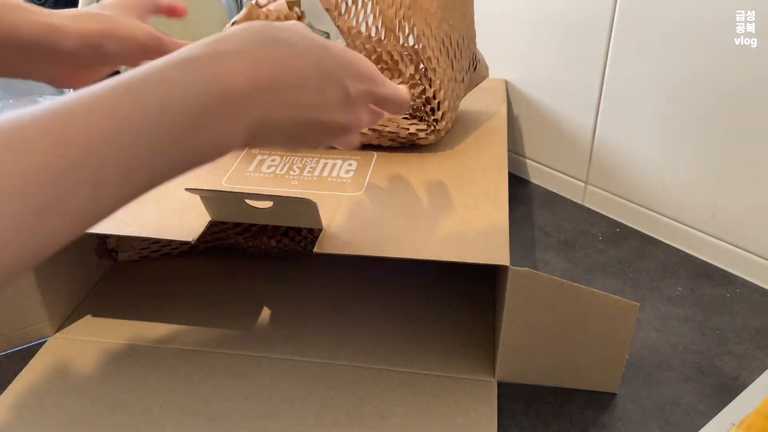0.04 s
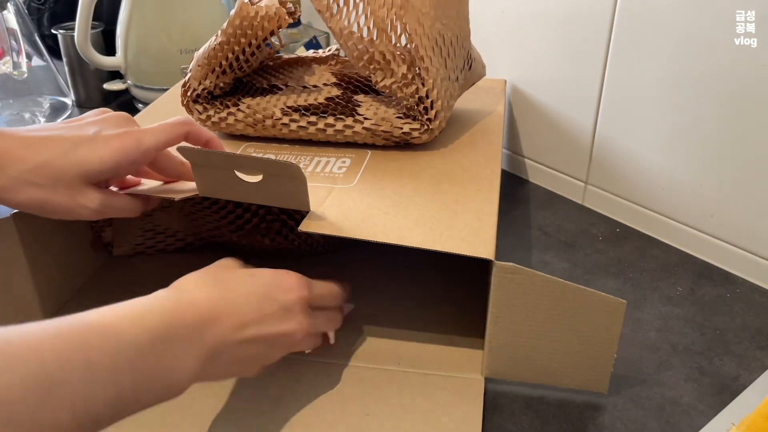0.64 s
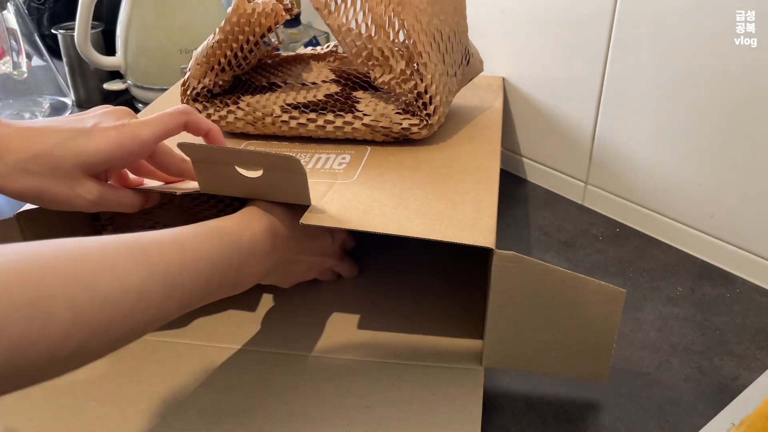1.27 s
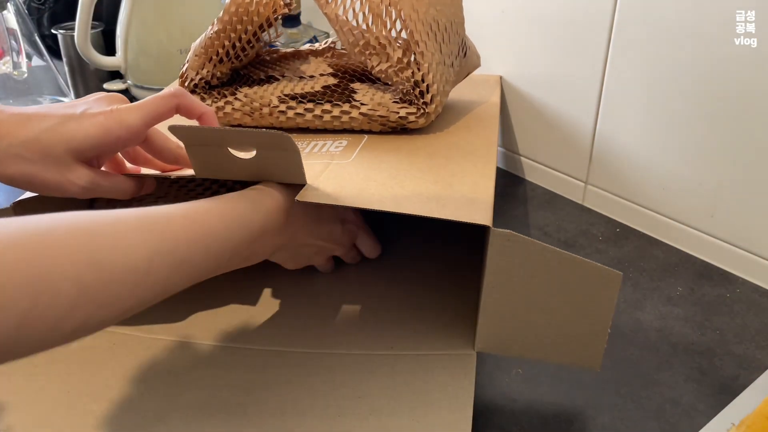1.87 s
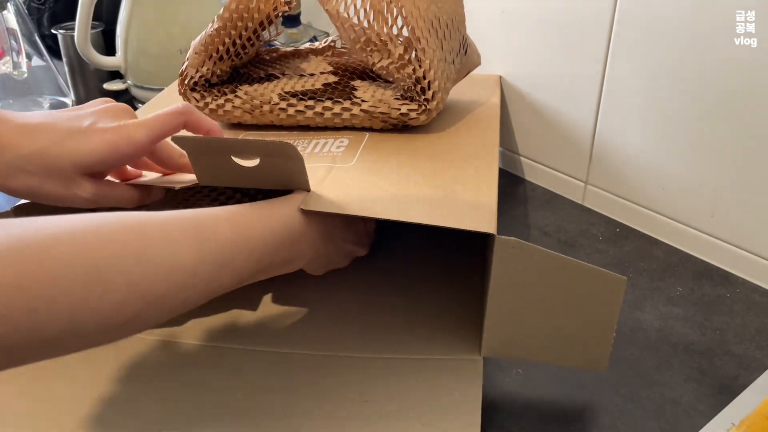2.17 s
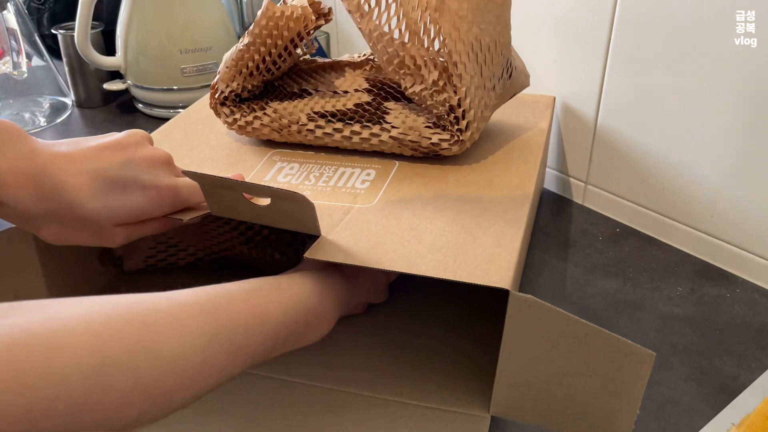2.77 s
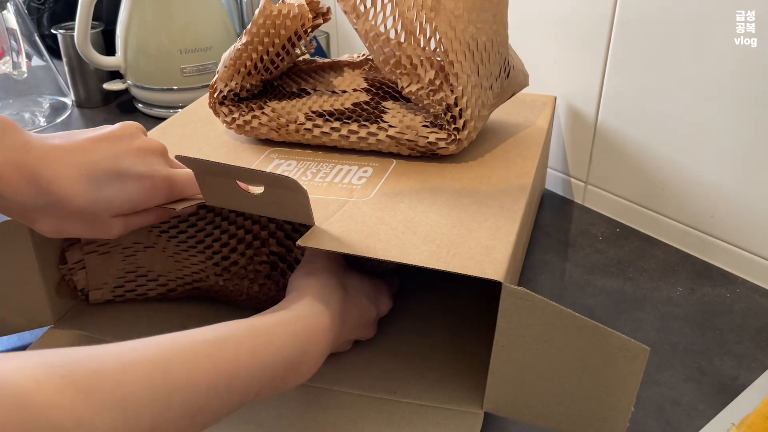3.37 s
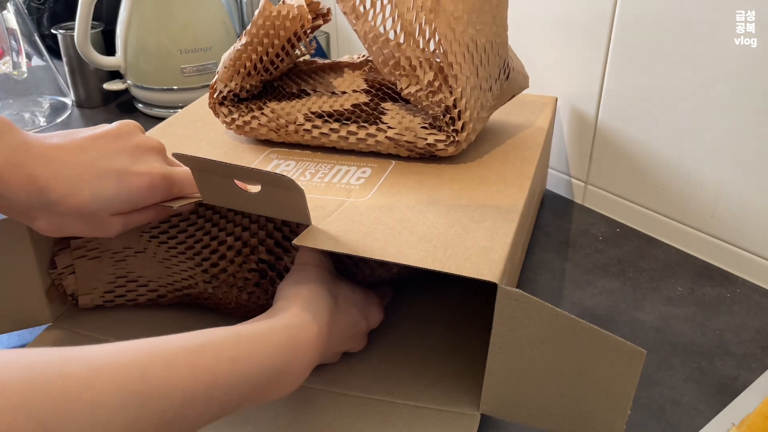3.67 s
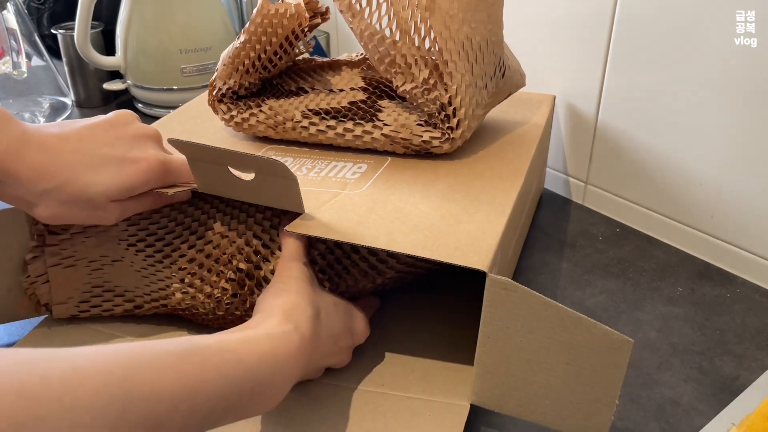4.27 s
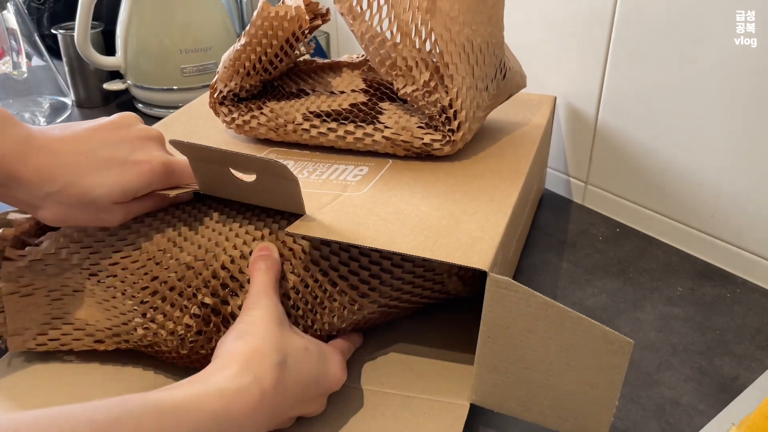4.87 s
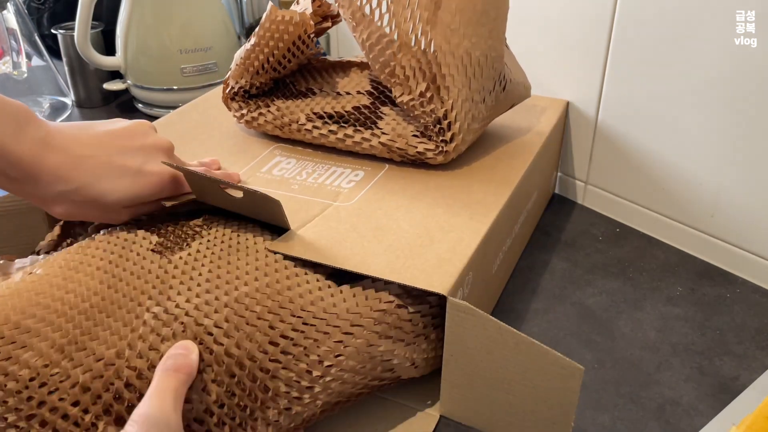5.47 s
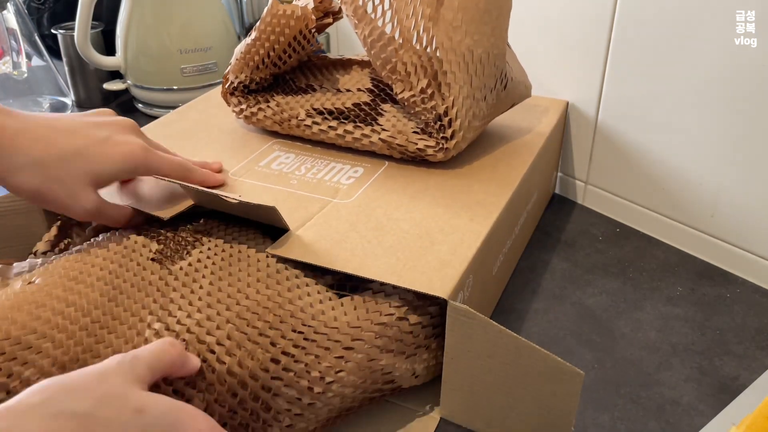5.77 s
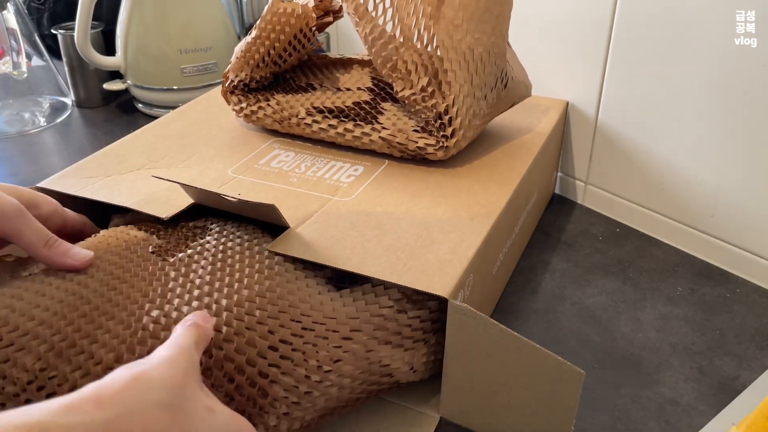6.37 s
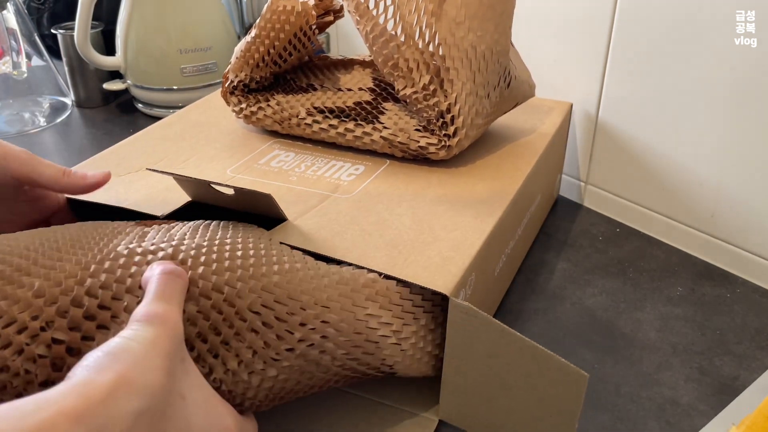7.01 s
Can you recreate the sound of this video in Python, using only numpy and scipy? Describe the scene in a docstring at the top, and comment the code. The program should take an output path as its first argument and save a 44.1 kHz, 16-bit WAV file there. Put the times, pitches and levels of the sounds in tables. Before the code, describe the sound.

A hand bumps around in a cardboard box, then drags out crackling kraft paper wrap in three tugs, followed by light rustling.

```python
"""A hand reaches into a cardboard box on a kitchen counter: panels thump, flaps clack, paper crinkles.
From 2.6 s three tugs drag out a wad of honeycomb kraft paper, which crackles in thousands of tiny
buckles, scrapes the box floor, ticks over the lid's edge and, in the last tug, squeals by stick-slip.
Near 5.5 s creases snap, and light touches follow until 7 s. Throughout, a phone close by hears
the reflections of the box and the tiled room over a faint rumble."""
import sys
import numpy as np
from scipy import signal
from scipy.fft import rfft, irfft
from scipy.io import wavfile
from scipy.ndimage import uniform_filter1d

SR = 44100
rng = np.random.default_rng(int(sys.argv[2]) if len(sys.argv) > 2 else 0)


def transcribe(u):
    """Save the signal u as a 16-bit wav file named by the first command-line argument.

    u: samples, shape (n,) or (channels, n), limited to [-1, 1]; the rate is SR.
    q: integer samples, one column per channel.
    """
    v = np.clip(np.atleast_2d(u).T, -1, 1)
    q = np.round(v * 32767).astype(np.int16)
    wavfile.write(sys.argv[1], SR, q)


N = 310464
SETTLE_DB_PER_S = 131.5  # the paper comes to rest once the hand lets go


def undb(db):
    """Amplitude ratio of a level: tenfold for every 20 dB."""
    return 10 ** (np.asarray(db) / 20)


def unit(x):
    """Normalisation to rms 1."""
    return x / np.sqrt(np.mean(x ** 2) + 1e-20)


def envelope(table, column):
    """Amplitude envelope from a column of timed levels, falling exponentially outside their span."""
    rows, t = np.array(table), np.arange(N) / SR
    outside_s = np.maximum(rows[0, 0] - t, 0) + np.maximum(t - rows[-1, 0], 0)
    return undb(np.interp(t, rows[:, 0], rows[:, column]) - SETTLE_DB_PER_S * outside_s)


def per_bin(table):
    """Interpolation over log frequency, giving a value at every spectral bin."""
    hz, values = np.array(table).T
    return np.interp(np.log(np.fft.rfftfreq(N, 1 / SR) + 1), np.log(hz), values)


def colour(x, spectrum):
    """Minimum-phase filtering shapes the spectrum while clicks keep their sharp fronts; rms 1."""
    cepstrum = irfft(np.log(undb(per_bin(spectrum))), N)
    response = np.exp(rfft(2 * cepstrum[:N // 2], N))
    return unit(irfft(rfft(x) * response, N))


def fade(t, t60):
    """Exponential decay by 60 dB in t60."""
    return np.exp(-np.log(1000) * t / t60)


def wander(rate):
    """Random modulation of rms 1, gliding to a new value `rate` times a second."""
    hold = max(int(SR / rate), 2)
    steps = np.repeat(rng.standard_normal(N // hold + 1), hold)
    return unit(uniform_filter1d(steps, hold)[:N])


def add(track, start, sound):
    """Superposition of a sound on the track at a time in s."""
    i = max(int(start * SR), 0)
    track[i:i + len(sound)] += sound[:len(track[i:])]


def clicks(rate, spread_db):
    """Poisson impulses, many small and a few large, with the same power at any rate."""
    size = undb(spread_db * np.minimum(rng.exponential(size=N), 4))
    return (rng.random(N) < rate / SR) * size * rng.choice([-1, 1], N) / np.sqrt(rate)


def ring(x, hz, q):
    """Response of a damped resonator driven by x."""
    return signal.lfilter(*signal.iirpeak(hz, q, fs=SR), x)


def room_rumble(level_db=-58.5):
    """Stationary noise, strongest in the bass: the kitchen at rest."""
    # (frequency [Hz], relative spectral density [dB])
    spectrum = [(25, -10), (60, 7), (140, 4.5), (300, -43), (1000, -27), (12000, -62)]
    return undb(level_db) * colour(rng.standard_normal(N), spectrum)


def reflections(x, t60, delay_s, top_hz, spot_count):
    """Diffuse reverberation, uncorrelated at the two ports, varies as sound comes from spot after spot."""
    t = np.arange(int(SR * t60)) / SR
    x = signal.sosfilt(signal.butter(2, [300, top_hz], "band", fs=SR, output="sos"), x)
    spots = np.array([wander(35) for _ in range(spot_count)])
    out = 0
    for share in spots / np.linalg.norm(spots, axis=0):
        tails = rng.standard_normal((2, SR))[:, :len(t)] * fade(t, t60) * (t > delay_s)
        tails /= np.linalg.norm(tails, axis=1, keepdims=True)
        out = out + signal.oaconvolve((share * x)[None], tails, axes=1)[:, :N]
    return out


def knocks(reach_octaves=0.36, contact_s=0.0014):
    """Modal vibration: a blow excites most the modes of the box near the pitch of the struck spot."""
    # blows on the box: (time [s], peak level [dB], pitch of the spot [Hz])
    blows = [(0.401, -29.5, 720), (0.405, -29.5, 290), (0.417, -21.5, 127), (0.4462, -29.5, 273),
             (1.074, -33, 89), (1.2044, -15, 860), (1.21, -29, 404), (1.212, -26.5, 99),
             (1.611, -28.5, 241), (2.397, -30, 273), (2.995, -17.5, 615), (3.007, -26, 160),
             (3.065, -16, 696), (3.072, -27, 128), (5.173, -21.5, 286), (5.188, -20.5, 148),
             (5.503, -29.5, 148), (6.0135, -51, 960), (6.144, -45, 960), (6.213, -37, 190),
             (6.585, -27.5, 149), (6.949, -26.5, 131)]
    # modes of the box: (frequency [Hz], relative level [dB], t60 [s])
    modes = [(91, -0.5, 0.24), (129.3, -0.5, 0.28), (151.6, 4.5, 0.18), (199, 2, 0.14), (249.5, 3.5, 0.3),
             (286, 5, 0.18), (361.6, 4, 0.19), (442, -2, 0.22), (665, -3, 0.02), (750, 5.5, 0.031),
             (832, 9.5, 0.022), (943, 5.5, 0.019), (1116, 1, 0.032)]
    out, t = np.zeros(N), np.arange(SR // 2) / SR
    hz, mode_db, t60 = np.array(modes).T[:, :, None]
    onset = 1 - np.exp(-(t / contact_s) ** 2)
    for start, db, spot_hz in blows:
        weight = undb(mode_db) / (1 + (np.log2(hz / spot_hz) / reach_octaves) ** 2)
        loaded_hz = hz * (1 + 0.027 * rng.standard_normal(hz.shape))  # the hands' load varies
        thump = onset * (weight * fade(t, t60) * np.sin(2 * np.pi * loaded_hz * t)).sum(0)
        add(out, start, undb(db) * thump / np.abs(thump).max())
    return out


def snaps(burst_s=0.006, panel_hz=820, panel_db=-2.5):
    """Impulsive excitation: a crease gives way in a broad burst, and the panel resonates with a clack."""
    # creases and flaps: (time [s], peak of the crack [dB], offset to panel_db [dB])
    creases = [(0.37, -45, 0), (.402, -41, 0), (0.4467, -33, 1.5), (.8175, -38, 4), (1.202, -28, -5),
               (1.607, -27.5, 3), (1.956, -27, -3.5), (2.436, -23.5, -6), (2.995, -30.5, 4),
               (3.064, -23, 1), (5.471, -18.5, -34), (5.4945, -18.5, -21), (5.5012, -24, -4.5),
               (6.013, -41.5, 0), (6.1444, -40.5, 2), (6.945, -21.5, 2)]
    out, t = np.zeros(N), np.arange(SR // 50) / SR
    band = signal.butter(1, [1500, 6500], "band", fs=SR, output="sos")
    for start, db, offset_db in creases:
        burst = rng.choice([-1, 1], len(t)) * np.exp(-(t / burst_s) ** 2)
        crack = signal.sosfilt(band, burst)
        clack = ring(ring(burst, panel_hz, q=5.1), panel_hz, q=1)
        snap = crack / np.abs(crack).max() + undb(panel_db + offset_db) * clack / np.abs(clack).max()
        add(out, start, undb(db) * snap)
    return out


def cardboard(buckles, drag, coupling=0.52, rumble_db=-22.5, rumble_exponent=0.58):
    """Forced vibration: dense slips and buckles sound through the panels; sparser bumps shake the box."""
    # panel response to slips: (frequency [Hz], relative gain [dB])
    scrape_spectrum = [(100, -62.5), (270, -5.5), (370, 1), (500, -2.5), (690, 0), (840, -0.1), (1050, -3),
                       (1300, -5), (1650, -5), (2000, -8), (3000, -22)]
    # whole-box response to bumps: (frequency [Hz], relative gain [dB])
    rumble_spectrum = [(25, -51), (38, -42), (55, -10.5), (90, -6.5), (140, 0.5), (200, -2.5), (260, -2.5),
                       (420, -18), (900, -45)]
    slips = unit(clicks(rate=1800, spread_db=3.5)) + coupling * buckles
    bumps = clicks(rate=400, spread_db=2.0)
    scrape = colour(slips, scrape_spectrum) * drag
    rumble = colour(bumps, rumble_spectrum) * undb(rumble_db) * drag ** rumble_exponent
    return scrape + rumble


def rasps(edge_s=0.031):
    """Gliding resonance: a hand sliding on cardboard, the box's hollow ring, paper scraping."""
    # gliding rasps: (start [s], end [s], first pitch [Hz], last pitch [Hz], level [dB], Q [-])
    glides = [(0.627, 0.765, 3500, 4200, -46.5, 1.8), (2.687, 3.4, 767, 720, -42, 6),
              (3.275, 3.465, 3900, 4000, -36.5, 6.7), (3.532, 3.622, 700, 775, -41, 6),
              (3.963, 4.146, 2360, 2330, -37, 5.6), (4.786, 5.02, 3420, 3500, -27.5, 0.86),
              (4.929, 5.06, 5500, 5150, -24.5, 2.6), (5.016, 5.27, 12400, 11600, -29.5, 3.7),
              (6.851, 7.027, 7040, 6100, -33.5, 4.3)]
    out, impulses = np.zeros(N), clicks(rate=800, spread_db=2.0)
    for start, end, first_hz, last_hz, db, q in glides:
        push = impulses[int(start * SR):int(end * SR)]
        t = np.arange(len(push)) / SR
        carrier = np.exp(2j * np.pi * np.cumsum(np.linspace(first_hz, last_hz, len(t))) / SR)
        pole = [1, -np.exp(-np.pi * first_hz / q / SR)]
        # shifting down, low-passing and shifting back makes the resonance follow the carrier
        baseband = signal.lfilter([1], np.convolve(pole, pole), push / carrier)
        swell = np.clip(np.minimum(t, t[-1] - t) / edge_s, 0, 1)
        add(out, start, undb(db) * swell * unit((carrier * baseband).real))
    return out


def squeals(jitter=0.032, flutter_db=3.3, edge_s=0.009):
    """Stick-slip oscillation: taut paper gripping the cardboard gives a rough, unsteady tone."""
    # fits of squealing: (start [s], length [s], first pitch [Hz], last pitch [Hz], level [dB])
    fits = [(4.32, 0.057, 2290, 2220, -31), (4.383, 0.059, 2230, 2090, -29), (4.458, .036, 2140, 2220, -31),
            (4.51, .122, 2280, 2274, -34.5), (4.642, 0.065, 2200, 2190, -33)]
    out = np.zeros(N)
    waver = 1 + jitter * wander(520)
    flutter = undb(flutter_db * wander(160))
    for start, length, first_hz, last_hz, db in fits:
        span = slice(int(start * SR), int((start + length) * SR))
        t = np.arange(len(waver[span])) / SR
        hz = np.linspace(first_hz, last_hz, len(t)) * waver[span]
        tone = flutter[span] * np.sin(2 * np.pi * np.cumsum(hz) / SR)
        swell = np.clip(np.minimum(t, t[-1] - t) / edge_s, 0, 1)
        add(out, start, undb(db) * swell * unit(tone))
    return out


def ticks(low_rise_s=0.00093, high_rise_s=0.00052, overtone_ratio=1.44, overtone_db=-7.0):
    """Free vibration: a released cell rings in two modes for milliseconds; the upper one dies first."""
    # cells ratcheting over an edge, lower mode: (time [s], level [dB], frequency [Hz])
    releases = [(2.0033, -27.5, 3080), (2.079, -26, 3250), (2.1002, -27, 3070), (2.1422, -25, 3200),
                (3.5305, -21, 2700), (3.55, -26, 2860), (3.56, -24, 2820), (3.5678, -23, 2610),
                (3.5813, -21, 2620), (3.6175, -18.5, 2700), (3.634, -26, 2560), (3.65, -24.5, 2500),
                (3.666, -22, 2730), (3.6736, -25, 2690), (3.687, -26, 2630), (3.697, -26, 2600),
                (3.717, -28, 2800), (3.726, -24.5, 2670), (3.742, -27, 2600), (3.7683, -21, 2720),
                (3.7825, -23.5, 2600), (3.816, -27, 2720), (4.001, -17.5, 2340), (4.1013, -14, 2360)]
    out, t = np.zeros(N), np.arange(SR // 50) / SR
    low_swell, high_swell = ((t / rise * np.exp(1 - t / rise)) ** 2 for rise in (low_rise_s, high_rise_s))
    for start, db, hz in releases:
        low = low_swell * np.sin(2 * np.pi * hz * t)
        high = high_swell * np.sin(2 * np.pi * overtone_ratio * hz * t)
        add(out, start, undb(db) * (low + undb(overtone_db) * high))
    return out


def crinkles(burst_s=0.0022, centre_hz=8400, scatter_octaves=0.2, gain_db=-1.0):
    """Buckling of single strips: each kink is a short, bright, heavily damped crack at its own pitch."""
    # strips kinking under the fingers: (time [s], relative peak level [dB])
    kinks = [(0.5665, -33), (0.572, -40), (0.627, -34), (0.952, -28), (1.0105, -40), (1.0864, -35),
             (1.1735, -22.5), (1.2, -24), (1.2888, -30), (1.4245, -27), (1.5583, -29), (1.594, -26),
             (1.71, -29), (1.7357, -26), (1.76, -27.5), (1.8015, -27), (1.856, -28), (1.9125, -31),
             (2.0042, -29), (2.054, -26), (3.8817, -28.5), (4.2587, -25), (5.4506, -29), (5.6165, -28),
             (5.755, -30), (5.7628, -29), (6.269, -23.5), (6.3747, -26), (6.3997, -27), (6.5834, -27),
             (6.803, -18), (6.849, -17), (6.8905, -15), (6.9895, -20)]
    out, t = np.zeros(N), np.arange(SR // 100) / SR
    for start, db in kinks:
        hz = centre_hz * 2 ** (scatter_octaves * rng.standard_normal())
        burst = rng.choice([-1, 1], len(t)) * np.exp(-t / burst_s)
        crack = ring(burst, hz, q=1)
        add(out, start, undb(db + gain_db) * crack / np.abs(crack).max())
    return out


def handling(attack_share=0.38):
    """Envelopes of crackle, scrape and treble: incoherent touches add in power to the strongest tug."""
    # three tugs, a table of relative levels each: (time [s], crackle [dB], scrape [dB], treble [dB])
    tugs = [
        [(2.58, -47, -43, -50.5), (2.736, -29.5, -30, -39), (2.936, -32, -32.5, -46), (2.992, -28, -28.5, -43),
         (3.184, -32, -32, -46), (3.422, -29.5, -33, -38), (3.51, -36, -36.5, -54), (3.82, -43, -41.5, -53.5),
         (3.89, -46, -47, -55)],
        [(3.89, -49, -43, -55), (4.004, -27.5, -33.5, -40.5), (4.124, -28, -33, -38.5),
         (4.236, -40, -40.5, -52)],
        [(4.24, -38, -41, -54), (4.324, -26.5, -31.5, -37), (4.548, -27.5, -34, -40.5),
         (4.664, -25, -34.5, -32), (4.764, -27.5, -36, -36.5), (4.876, -24, -34, -31), (5.146, -25, -31, -30),
         (5.17, -21, -26, -27.5), (5.228, -23.5, -36, -25), (5.264, -31.5, -40.5, -33.5),
         (5.42, -42, -45, -52.5)],
    ]
    # light touches, plus a faint background hiss just before 6 s:
    # (start [s], length [s], crackle [dB], scrape [dB], treble [dB])
    touches = [(0.0, 0.0026, -45.5, -46, -59), (0.361, 0.14, -56, -49, -67),
               (0.56, 0.19, -60, -55.5, -53.5), (0.85, 0.25, -46.5, -48.5, -58),
               (1.128, 0.09, -43, -45.5, -51), (1.228, 0.08, -47, -45, -56),
               (1.391, 0.11, -44.5, -47.5, -49.5), (1.559, 0.052, -43, -43.5, -49.5),
               (1.675, 0.12, -51, -52, -53.5), (1.777, 0.2, -47, -44, -55), (1.976, 0.23, -43, -41.5, -52),
               (2.201, 0.076, -36, -37.5, -42), (2.347, 0.094, -41, -40.5, -46),
               (5.478, 0.017, -40, -39, -51), (5.55, 0.15, -50, -53, -53.5),
               (5.727, 0.071, -48, -47.5, -51.5), (5.85, 0.13, -65.5, -80, -71),
               (6.009, 0.085, -58, -60.5, -64), (6.143, 0.02, -50.5, -49, -49.5),
               (6.187, 0.13, -45, -48.5, -46), (6.338, 0.085, -41, -44.5, -48.5),
               (6.49, 0.19, -37.5, -42, -42.5), (6.748, 0.17, -39, -46, -35.5),
               (6.857, 0.19, -33.5, -39, -39.5)]
    t = np.arange(N) / SR
    power = np.max([[envelope(tug, column) for column in (1, 2, 3)] for tug in tugs], axis=0) ** 2
    for start, length, *levels_db in touches:
        press = np.clip((t - start) / (attack_share * length), 0, 1)
        settle = undb(-SETTLE_DB_PER_S * np.clip(t - start - length, 0, 1))
        power = power + np.outer(undb(levels_db), press * settle) ** 2
    return np.sqrt(power)


def buckling(effort, cracks_per_effort=4600, cells_per_effort=220, cell_db=-5.5, clump_db=0.94):
    """Acoustic emission: fibres crack broadly and buckling cells ring, both in little avalanches."""
    pitches_hz = np.geomspace(1000, 15000, 18)
    cells = sum(ring(clicks(effort * cells_per_effort, spread_db=1.5), hz, q=7) for hz in pitches_hz)
    cracks = clicks(effort * cracks_per_effort, spread_db=0.5)
    avalanches = undb(clump_db * wander(170))
    return (unit(cracks) + undb(cell_db) * unit(cells)) * avalanches


def paper(buckles, crumple, treble, body_db=-1.17, treble_db=1.5):
    """Radiation: the paper gives off its buckles as crackle, body and treble each with its envelope."""
    # body of the crackle: (frequency [Hz], relative gain [dB])
    body_spectrum = [(150, -57), (800, -2.5), (1250, -4), (2200, 3.5), (3200, 3), (4600, 0), (6700, -4.5),
                     (8000, -15.5), (11000, -63)]
    # bright treble hiss: (frequency [Hz], relative gain [dB])
    treble_spectrum = [(3000, -33.5), (6500, 1), (8200, -3), (10000, -0.5), (12000, -5), (13500, -5),
                       (15500, -24)]
    body = undb(body_db) * crumple * colour(buckles, body_spectrum)
    hiss = undb(treble_db) * treble * colour(buckles, treble_spectrum)
    return body + hiss


def microphone_ports(air):
    """Two-point reception: the phone's two ports differ in level and phase, depending on frequency."""
    # (frequency [Hz], left minus right level [dB])
    balance = [(60, 5.5), (130, 0), (700, 2.5), (1400, 2), (2800, 3.5), (5500, 4.5), (7700, 0.5)]
    # (frequency [Hz], phase lead of the left port [rad])
    lead = [(700, 0), (1400, -.3), (2800, .6), (5500, .1), (7000, -1.4), (7800, -2.7), (8300, -3.15),
            (9000, -4), (10700, -6), (12400, -6.4), (14000, -9.3)]
    sides = np.array([[0.5], [-0.5]])
    response = undb(sides * per_bin(balance)) * np.exp(1j * sides * per_bin(lead))
    return irfft(rfft(air) * response, N)


def scene(crowding=0.4, box_db=-4.5, kitchen_db=-3.5, rim_echo_db=-6):
    """Superposition of direct sound, reflections off the box walls and tiles, and the room's rumble."""
    crumple, drag, treble = handling()
    # sparse grains under a light touch, a dense crunch under a hard pull
    buckles = buckling(effort=unit(np.hypot(crumple, treble)) ** crowding)
    inside = paper(buckles, crumple, treble) + cardboard(buckles, drag) + rasps() + snaps()
    # sounds at the open rim and from the outer panels reach the phone with less echo
    rim = ticks() + crinkles() + squeals() + knocks()
    into_box = inside + undb(rim_echo_db) * rim
    into_kitchen = inside + undb(rim_echo_db / 2) * rim
    box = reflections(into_box, t60=0.035, delay_s=0.0005, top_hz=5000, spot_count=6)
    kitchen = reflections(into_kitchen, t60=0.41, delay_s=0.0066, top_hz=4540, spot_count=3)
    air = inside + rim + undb(box_db) * box + undb(kitchen_db) * kitchen + room_rumble()
    return microphone_ports(air)


def record(dry):
    """Band limiting: the phone cuts the bass below 38 Hz and the treble above 15850 Hz."""
    high_pass = signal.butter(4, 38, "high", fs=SR, output="sos")
    low_pass = signal.ellip(10, 0.2, 80, 15850, fs=SR, output="sos")
    return signal.sosfilt(low_pass, signal.sosfilt(high_pass, dry))


dry = scene()
out = record(dry)
transcribe(out)
```